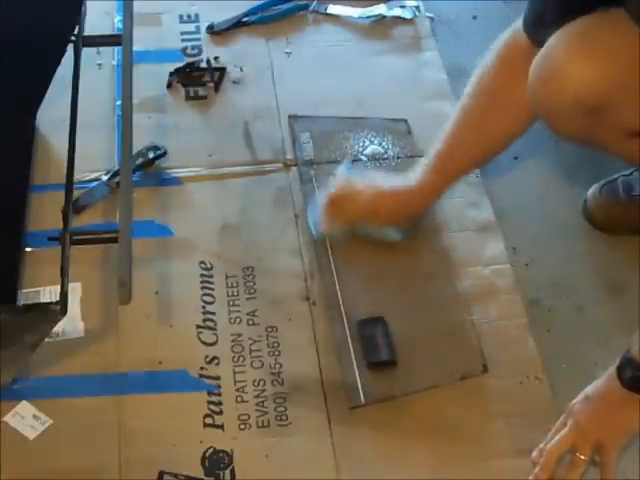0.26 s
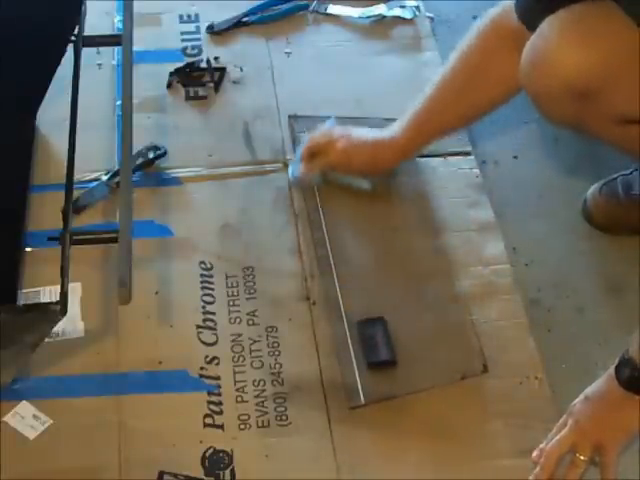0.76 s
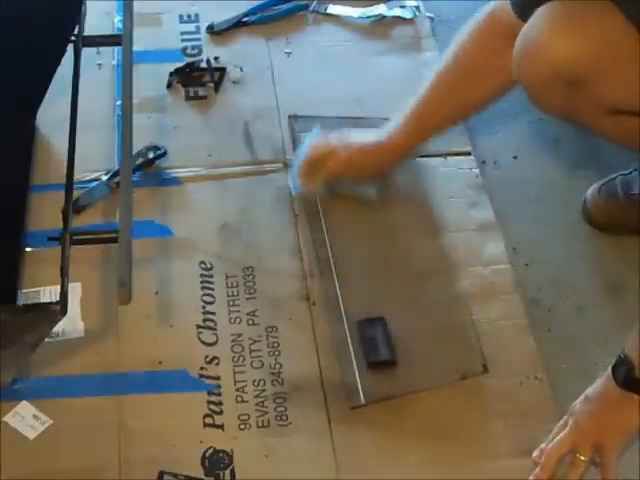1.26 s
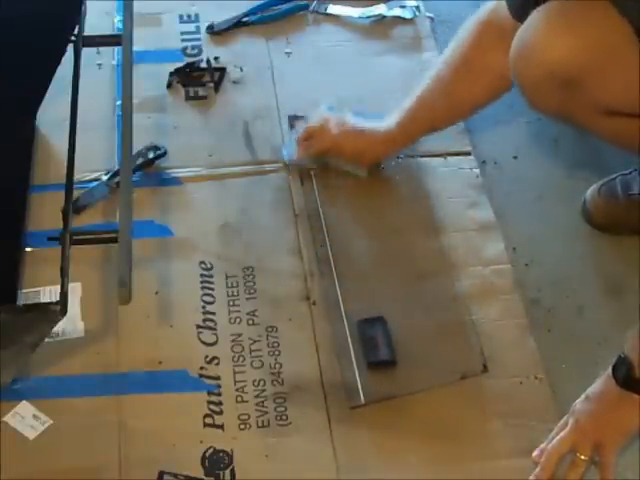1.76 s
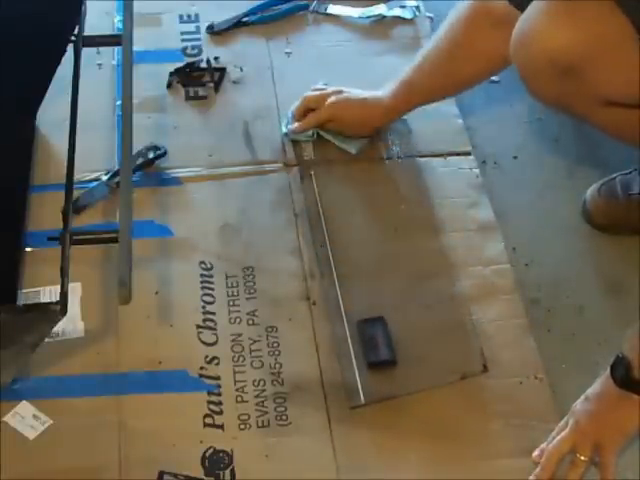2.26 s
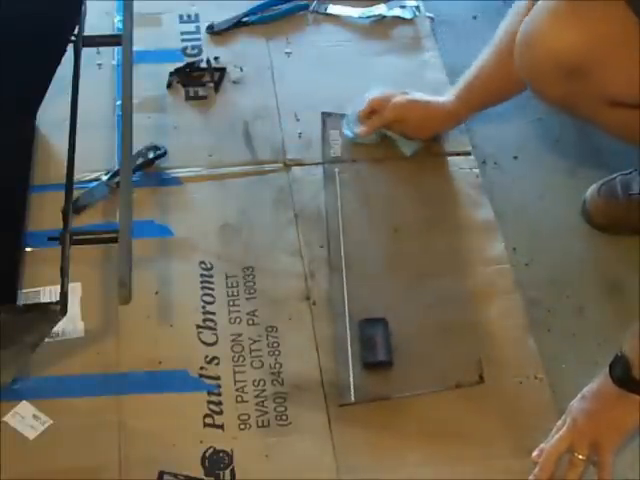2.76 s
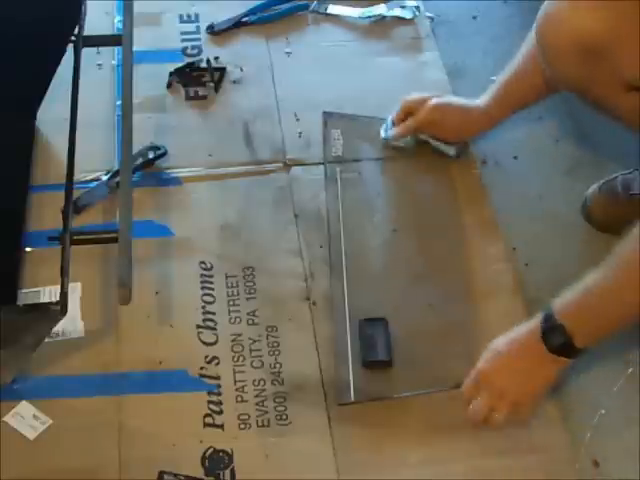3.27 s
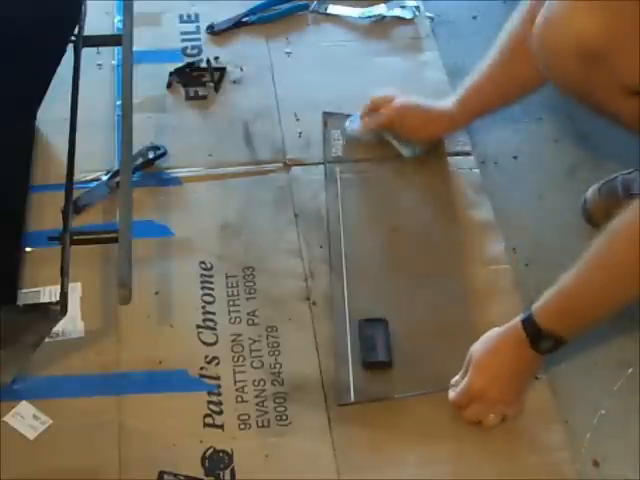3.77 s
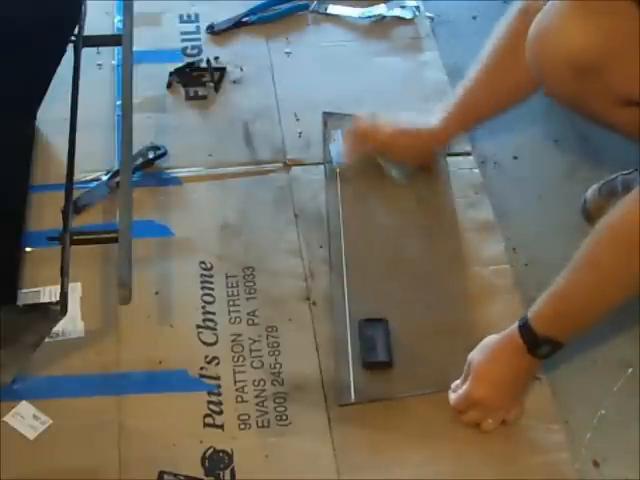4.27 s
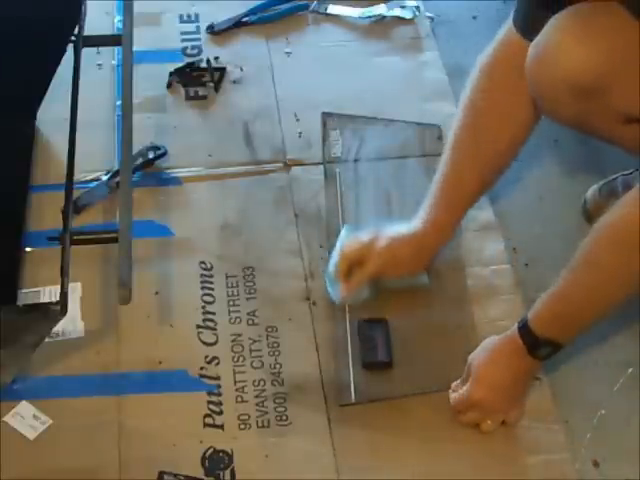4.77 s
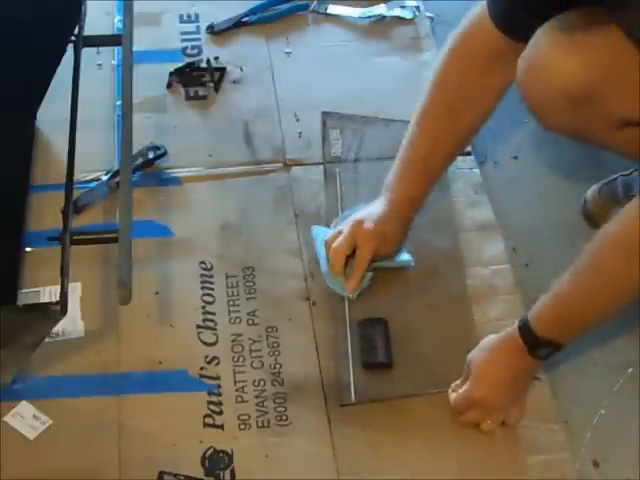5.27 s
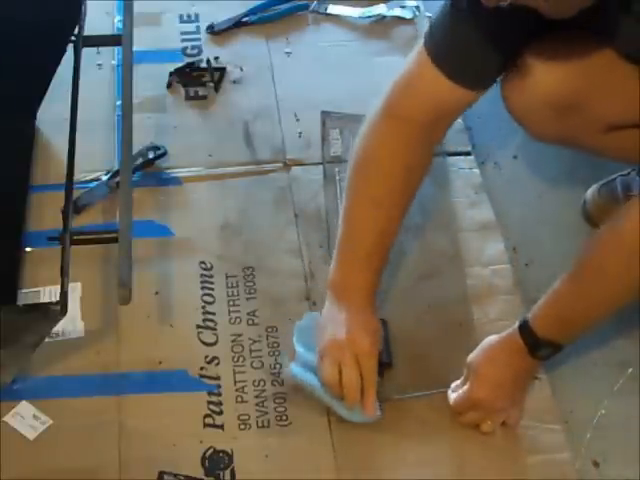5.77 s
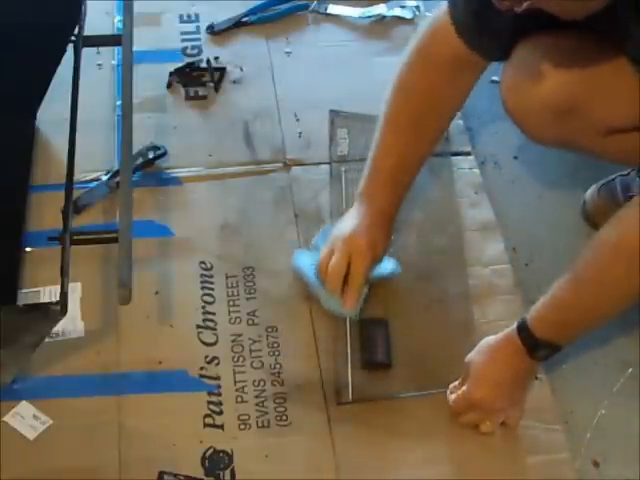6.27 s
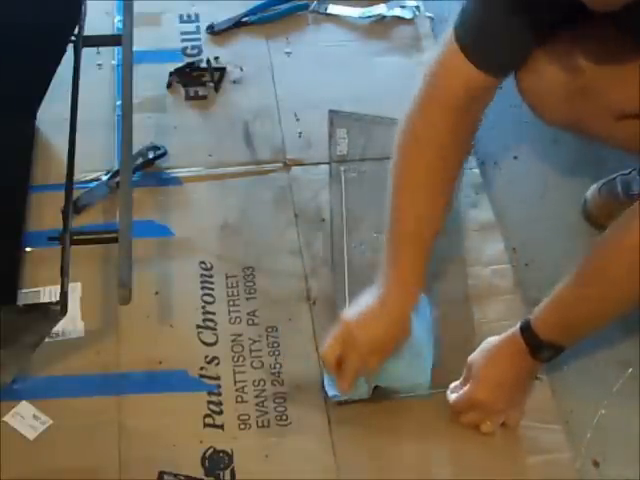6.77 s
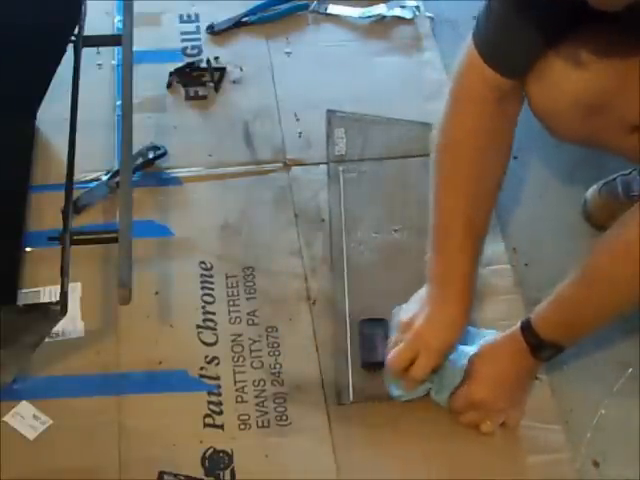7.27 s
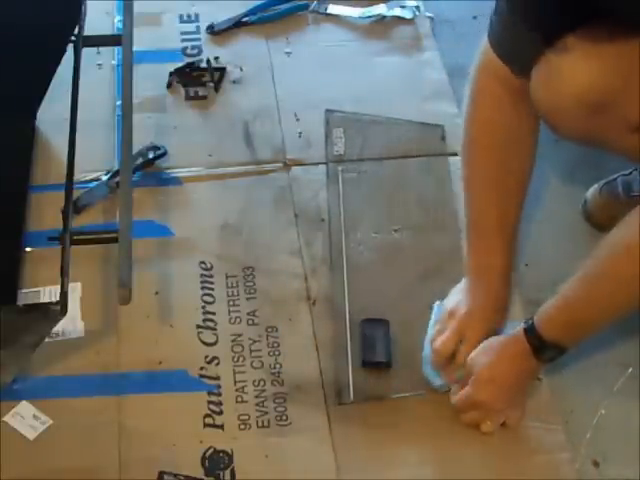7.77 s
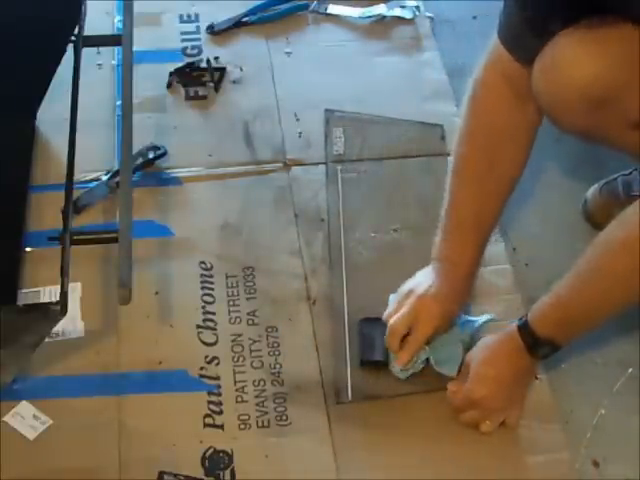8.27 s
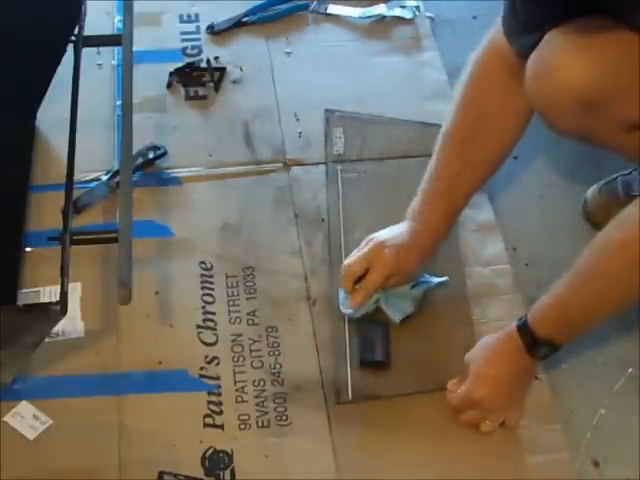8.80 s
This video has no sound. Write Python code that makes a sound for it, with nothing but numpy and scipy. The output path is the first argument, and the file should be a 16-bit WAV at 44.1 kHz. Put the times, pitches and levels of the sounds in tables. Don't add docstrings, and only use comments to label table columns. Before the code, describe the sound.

A folded cloth wipes a glass pane in short uneven hissing strokes, with knocks and rattles over low garage hum and a faint distant engine.

```python
import sys
import numpy as np
from scipy import signal
from scipy.fft import rfft, irfft, next_fast_len
from scipy.io import wavfile
from scipy.ndimage import uniform_filter1d

SR = 44100
rng = np.random.default_rng(int(sys.argv[2]) if len(sys.argv) > 2 else 0)


def unload_wav(signal):
    wavfile.write(
        sys.argv[1],
        SR,
        np.round(np.clip(np.atleast_2d(signal).T, -1, 1) * 32767).astype(np.int16),
    )


def volts(x):
    e = np.asarray(x, float) / 20
    return 10 ** e


N = 398663

# [f/Hz, level per Hz/dB]
HISS_TONE = [(76, -27.5), (130, -16), (160, -3), (772, -11), (1290, -11.5), (1850, -16.5), (3600, -7.5),
             (4500, -20), (6790, -20.5), (7270, -22.5), (7790, -29.5), (10100, -84.5), (17100, -120)]
HISS_DB = -59.5
# [f/Hz, level per Hz/dB]
RUMBLE_TONE = [(2, 1.5), (8, -1.5), (20, 2.5), (32, -8), (50, -6), (80, -5.5), (120, -6.5), (150, -16),
               (400, -25.5), (800, -48)]
# [t/s, level/dB]
TRAFFIC = [
    (0.0, -60),
    (1.1, -60.5),
    (1.6, -60.5),
    (3.0, -60),
    (5.3, -60.5),
    (5.84, -57),
    (7.3, -60.5),
    (7.83, -50),
    (8.33, -54.5),
    (9.04, -62.5),
]
# [t/s, f/Hz, level/dB]
HUM = [(0.0, 55.8, -64), (.45, 60.44, -56), (1.85, 60.64, -59.5), (2.1, 56.8, -58), (2.3, 57, -55),
       (2.55, 61.4, -66), (3.0, 61, -57), (3.8, 61.2, -62.5), (4.3, 61.6, -59), (5.2, 60.9, -57),
       (6.0, 63, -60), (6.6, 58.5, -71), (6.9, 62.74, -56.5), (7.45, 61.15, -58), (7.65, 59.9, -50),
       (8.45, 60.55, -48.5), (8.65, 59.4, -58.5), (9.04, 58, -54)]
# [t/s, f/Hz, level/dB]
ENGINE = [(0.0, 107, -56), (.25, 103, -57.5), (1.8, 104.5, -60.5), (2.85, 110, -59.5), (4.2, 115, -63.5),
          (4.62, 115.5, -60.5), (4.9, 96, -66), (6.6, 96.5, -63), (7.4, 98, -62.5), (7.8, 98, -66),
          (8.3, 94, -65.5), (9.04, 92, -67)]

# [f/Hz, level per Hz/dB]
RUB_TONE = [(180, -71), (300, -31.5), (422, -8.5), (748, -34.5), (857, -17), (995, -22.5), (1250, -15),
            (1360, -19), (3530, 1), (6710, -14.5), (7790, -21), (10100, -74), (17100, -120)]
# [f/Hz, share 0-1]
WEAVE_SHARE = [(3900, 0.1), (6000, 0.96)]
BOARD_SHARE = [(1300, 0.97), (2500, 0.27), (3200, 0.01)]
# [full-speed t/s, run-up/s, hold/s, rubbing level/dB, cardboard drone rel. level/dB]
STROKES = [(0.0, .05, 0.016, -56.5, -13), (0.895, 0.12, 0.038, -50.5, -29.5), (1.478, 0.12, 0.15, -52, -13),
           (1.909, 0.092, 0.033, -47.5, -10.5), (2.337, 0.07, 0.05, -58, -12), (2.527, 0.04, 0.044, -51, 0),
           (2.611, 0.13, 0.076, -49, -7.5), (2.971, 0.24, .1, -54.5, -11), (3.263, 0.23, 0.066, -53, -6),
           (3.508, .08, 0.086, -48.5, -1.5), (3.903, 0.076, .03, -56.5, -6.5),
           (4.743, .2, 0.15, -50.5, -21.5), (5.536, 0.023, 0.023, -43, -19), (5.604, 0.074, 0.16, -45, -15),
           (6.287, 0.19, .2, -43, -11.5), (7.104, .08, 0.07, -55, -14), (7.246, 0.094, 0.061, -53.5, -7),
           (7.403, .03, .05, -54.5, -4), (7.521, 0.048, 0.091, -44.5, -4), (7.754, 0.14, .2, -48.5, -6.5),
           (8.13, .05, 0.066, -50, -4), (8.748, 0.045, .065, -52, -2)]
RUN_UP_DB, SAG_DB_PER_S, RELEASE_DB_PER_S = 17, 22, 81
WEAVE_PER_SPEED = 0.11
WEAVE_DB, WEAVE_PER_BOARD = -8, -0.14
# [t/s, rubbing level/dB, fine weave rel. level/dB, cardboard drone rel. level/dB]
FLICKS = [(.22, -68, 1, -24), (.66, -59, -2.5, -12), (1.138, -46.5, -4.5, -14), (2.14, -63.5, -3, -11.5),
          (3.75, -73, -15.5, -5), (4.266, -58, -14, -24), (5.03, -55, -3, -4), (5.173, -44, -13, -16),
          (5.419, -59.5, -1.5, -18), (6.95, -52, -9, -6.5), (7.99, -50, -10, -1), (8.386, -55, -5, -6),
          (8.486, -49.5, -6, -8.5), (8.601, -42.5, -4, -12), (8.575, -61, -2, -16), (8.784, -53, 8, -17),
          (1.842, -55.5, -4, -3), (2.25, -66, 5, -13), (6.02, -50, -10, -9), (6.08, -56.5, -9, 0)]
FLICK_RISE_S, FLICK_HOLD_S, FLICK_RELEASE_DB_PER_S = .05, 0.012, 142
TAIL_DB, TAIL_RISE_S, TAIL_RELEASE_DB_PER_S = -27.5, 0.016, 87
TAIL_WEAVE_DB, TAIL_BOARD_DB = -9, -1
REST_DB, REST_WEAVE_DB, REST_BOARD_DB = -70, 6, -15
LIFT_AT_S, LIFT_S, LIFT_DB = 6.75, 0.27, -17

# [f/Hz, t60/s]
GARAGE_DECAY = [(400, 0.7), (1000, 0.68), (3000, 0.57), (5500, 0.44), (7500, 0.14)]
# [t/s, level/dB]
ECHOES = [(.0065, -10), (.0155, -7), (.023, -12), (.031, -10), (.051, -13)]

# [t/s, peak level/dB, low
# rel. level/dB, high rel. level/dB, share of pane 0-1]
KNOCKS = [(.338, -27.5, -10, -20, 0.03), (.578, -44, -20, 6, 0), (0.911, -42, -9, -21, 0.8),
          (.993, -30.5, -7.5, -26, 0.2), (2.124, -42, -8, -9, 0), (3.4467, -33.5, 5, -27.5, 0.5),
          (3.46, -29, -6.5, -14.5, 0.14), (3.966, -27, -8, -14, 0.3), (4.253, -41.5, -4, -8, 0.2),
          (4.5, -29.5, -9, -12.5, 0.44), (5.024, -47, -14, -3, 0.2), (5.167, -40, -9, 6, .8),
          (5.54, -40, -25, 2.5, 0.8), (5.965, -48, 2, -25, 0.9), (6.017, -31.5, -5.5, -3, 0.2),
          (7.388, -37, -10, -16, 0.5), (7.456, -14.5, -11, -8, 1), (7.459, -28.5, 9, -28, 1),
          (7.738, -42, -8, 9, 0.6), (7.987, -41, 9, -29, 0.4), (8.069, -26.5, -9.5, -6.5, 0.52),
          (8.373, -48, -28, 4, 0.9), (8.475, -40, -17, 7, 0.6)]
# [f/Hz, level/dB, t60/s]
TRIM = [(990, -10, .02), (1590, -3, .018), (2380, -9, .04), (2700, -9, .015), (3200, 2, .015),
        (3800, -7, .015), (4600, -8, .015)]
# [f/Hz, level/dB, t60/s]
PANE = [(860, -4, .02), (1170, -6, .04), (1310, -7, .04), (1980, -3, .03), (2240, -6, .05), (2390, -5, .05),
        (2470, -8, .05), (3300, 0, .015), (3750, -2, .03), (4450, -4, .02), (5180, -5, .04),
        (5430, -5, .05), (6200, -9, .015)]
RATTLE_S, RATTLE_GROWTH = .0045, .45

# [t/s, run-up/s, hold/s,
# level/dB]
SING_5395 = [(5.176, .02, .01, -59), (5.288, .04, .01, -68), (7.28, .3, .03, -64), (8.063, .02, .01, -51.5),
             (8.132, .03, .07, -75), (8.605, .025, 0.048, -54), (8.781, .05, 0.065, -48)]
SING_5550 = [(5.18, .02, 0.022, -47), (7.34, .1, .01, -62), (7.465, .01, 0.073, -49.5)]
SING_1300 = [(5.185, 0.055, 0.069, -60.5), (3.23, .05, 0.1, -62.5)]
DRONE_1600 = [(6.449, .1, 0.058, -57.5), (6.72, 0.18, 0.3, -67)]
# [f/Hz, width/Hz]
SING_MODES = [(5395, 80), (5550, 600), (1300, 90), (1600, 300)]
SING_RELEASE_DB_PER_S = 214

# [t/s, f/Hz, level/dB, length/s]
THUDS = [(5.85, 144, -60, 0.13), (5.8, 36, -58, .12), (3.4, 28, -54, .15), (8.55, 36, -46, .12),
         (7.75, 178, -66, 0.3)]


def evened(x):
    return x / np.sqrt(np.mean(x ** 2) + 1e-20)


def curve(rows, silent=-120.):
    s, *columns = np.transpose(rows)
    t = np.arange(N) / SR
    return [np.interp(t, s, column, silent, silent) for column in columns]


def read(points, hz):
    f, value = np.transpose(points)
    return np.interp(np.log(hz + 1), np.log(f + 1), value)


def coloured(x, points):
    size = next_fast_len(len(x))
    gain = volts(read(points, np.fft.rfftfreq(size, 1 / SR)))
    return irfft(rfft(x, size) * gain, size)[:len(x)]


def drift(seconds):
    size = max(round(seconds * SR), 2)
    smooth = uniform_filter1d(rng.standard_normal(N), size)
    return evened(uniform_filter1d(smooth, size))


def room_hiss():
    return volts(HISS_DB + 0.14 * drift(0.18)) * evened(coloured(rng.standard_normal(N), HISS_TONE))


def rumble():
    return volts(curve(TRAFFIC)[0] + 2.0) * evened(coloured(rng.standard_normal(N), RUMBLE_TONE))


def wavering(rows, waver, throb_db):
    hz, db = curve(rows)
    turns = np.cumsum(np.maximum(hz, 0) * (1 + waver * drift(0.049))) / SR
    level = uniform_filter1d(volts(db + throb_db * drift(0.043)), size=2000)
    return level * np.sqrt(2) * np.sin(2 * np.pi * turns)


def hum():
    return wavering(HUM, waver=.04, throb_db=1.0)


def engine():
    return wavering(ENGINE, waver=.011, throb_db=1.5)


def fibres(per_s=6000, spread_db=0.5, catch_db=1.0):
    size = volts(spread_db * np.minimum(rng.exponential(1, N), 4)) * rng.choice([-1., 1.], N)
    slips = rng.random(N) < per_s / SR
    return evened(size * slips * volts(catch_db * drift(0.018)))


def gesture(t, s, rise, hold, db, release_db_per_s):
    late = t - s
    run_up = RUN_UP_DB * np.minimum(late, 0) / max(rise, .005)
    sag = SAG_DB_PER_S * np.clip(late, 0, hold)
    release = release_db_per_s * np.maximum(late - hold, 0)
    return volts(db + run_up - sag - release)


def hand(t):
    rest = volts(REST_DB + LIFT_DB * np.exp(-((t - LIFT_AT_S) / LIFT_S) ** 4))
    moves = [(rest, REST_WEAVE_DB, REST_BOARD_DB)]
    for s, rise, hold, db, board in STROKES:
        gain = gesture(t, s, rise, hold, db, RELEASE_DB_PER_S)
        moves.append((gain, WEAVE_DB + WEAVE_PER_BOARD * board, board))
    for s, db, weave, board in FLICKS:
        gain = gesture(t, s, FLICK_RISE_S, FLICK_HOLD_S, db, FLICK_RELEASE_DB_PER_S)
        moves.append((gain, weave, board))
    for s, db, *_ in KNOCKS:
        gain = gesture(t, s + TAIL_RISE_S, TAIL_RISE_S, 0, db + TAIL_DB, TAIL_RELEASE_DB_PER_S)
        moves.append((gain * (t > s), TAIL_WEAVE_DB, TAIL_BOARD_DB))
    gains, weave_db, board_db = zip(*moves)
    power = np.array(gains) ** 2
    total = power.sum(0)
    rub_db = 10 * np.log10(total)
    fine_db = np.dot(weave_db, power) / total + WEAVE_PER_SPEED * (rub_db + 49)
    return rub_db, fine_db, np.dot(board_db, power) / total


def cloth():
    hz, t, z = signal.stft(fibres(), SR, nperseg=256)
    rub_db, fine_db, board_db = hand(t)
    fine = read(WEAVE_SHARE, hz)[:, None]
    board = read(BOARD_SHARE, hz)[:, None]
    colour_db = read(RUB_TONE, hz)[:, None] + fine * (fine_db + 8.5) + board * (board_db + 16.5)
    return signal.istft(z * volts(rub_db + colour_db + 12.5), SR, nperseg=256)[1][:N]


def garage(x, echo_db):
    length, spacing = 36000, 12
    taps = np.zeros((len(x), length))
    at = np.arange(300, length - spacing, spacing)
    at = at + rng.integers(0, spacing, (len(x), len(at)))
    np.put_along_axis(taps, at, rng.choice([-1., 1.], at.shape), axis=1)
    hz, t, z = signal.stft(taps, SR, nperseg=256)
    decay = volts(-60 * t / read(GARAGE_DECAY, hz)[:, None])
    tail = signal.istft(z * decay, SR, nperseg=256)[1]
    tail /= np.linalg.norm(tail[0])
    for s, db in ECHOES:
        tail[:, round(s * SR)] += volts(db + echo_db)
    return signal.oaconvolve(x, tail, axes=1)[:, :N].sum(0)


def ring(modes):
    hz, db, t60 = np.transpose(modes)[:, :, None]
    t = np.arange(3000) / SR
    place_db = 1.5 * rng.standard_normal(db.shape)
    sines = np.sin(2 * np.pi * (hz * t + rng.random(db.shape)))
    tone = (volts(db + place_db - 60 * t / t60) * sines).sum(0)
    return tone / np.linalg.norm(tone)


def rattle(peak_db):
    t = np.arange(3000) / SR
    length = RATTLE_S * volts(RATTLE_GROWTH * (peak_db + 32.5))
    ticks = rng.standard_normal(len(t)) * np.minimum(t / 0.0012, 1) * np.exp(-t / max(length, .0004))
    z = rfft(ticks)
    return irfft(z / np.sqrt(uniform_filter1d(abs(z) ** 2, size=30)), len(t))


def knocks(ring_db=-3.5):
    out = np.zeros((3, N + 8000))
    swell = np.minimum(np.arange(3000) / SR / 0.0014, 1)
    lead = 200
    for k, (s, peak_db, low_db, high_db, pane) in enumerate(KNOCKS):
        crack = rattle(peak_db)
        pane = np.clip(pane, 0, 1)
        modes = np.sqrt(1 - pane) * ring(TRIM) + np.sqrt(pane) * ring(PANE)
        body = crack + volts(ring_db) * modes * swell
        tone = [(250, low_db - 21), (550, low_db + 0.5), (800, low_db + 5), (1600, low_db + 8.0),
                (2300, 0.0077), (3700, 0.015),
                (4800, high_db + 6), (7500, high_db - 1), (9000, high_db - 29.0)]
        body = coloured(np.pad(body, (lead, 0)), tone)
        at = round((s - .0012) * SR) - lead
        out[k % 3, at:at + len(body)] += volts(peak_db) * body / abs(body).max()
    return out[:, :N]


def resonate(x, hz, width):
    turn = np.exp(2j * np.pi * np.cumsum(hz * np.ones(len(x))) / SR)
    r = np.exp(-np.pi * width / SR)
    return 2 * (turn * signal.lfilter([1 - r], [1, -r], x / turn)).real


def singing():
    slips = fibres(per_s=2500, spread_db=1.5, catch_db=1.5)
    t, out = np.arange(N) / SR, 0
    for spans, (hz, width) in zip((SING_5395, SING_5550, SING_1300, DRONE_1600), SING_MODES):
        level = sum(gesture(t, *row, SING_RELEASE_DB_PER_S) for row in spans)
        unsteady_hz = hz * (1 + .002 * drift(0.042))
        mode = resonate(resonate(slips, unsteady_hz, width), hz, width)
        out = out + level * evened(mode)
    return out


def thuds():
    t, out = np.arange(N) / SR, 0
    for s, hz, db, length in THUDS:
        out = out + volts(db) * np.exp(-2 * ((t - s) / length) ** 2) * np.sin(2 * np.pi * hz * t)
    return out


def scene():
    background = room_hiss() + rumble() + hum() + engine() + thuds()
    rubbing = cloth() + singing()
    bumps = knocks()
    wiped = volts(-1.0) * rubbing + volts(-12.5) * garage(rubbing[None], echo_db=-15.5)
    knocked = bumps.sum(0) + volts(-3.0) * garage(bumps, echo_db=-1.5)
    mono = wiped + knocked + background
    return np.array([mono, mono])


def roll_off(x):
    return signal.sosfilt(signal.butter(12, 7940, fs=SR, output="sos"), x)


def record(dry):
    band_limit = signal.firwin(161, 7416, window=("kaiser", 9), fs=SR)
    limited = signal.oaconvolve(dry, band_limit[None], "same")
    shared_hiss = volts(-88) * rng.standard_normal(N)
    channel_hiss = volts(-106) * rng.standard_normal(dry.shape)
    offset = -.0017
    return roll_off(limited + offset + shared_hiss + channel_hiss)


dry = scene()
out = record(dry)
unload_wav(out)
```